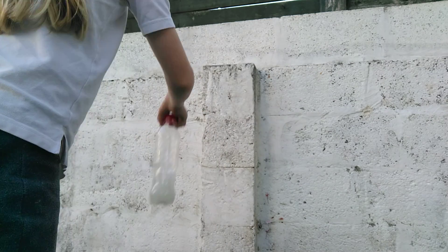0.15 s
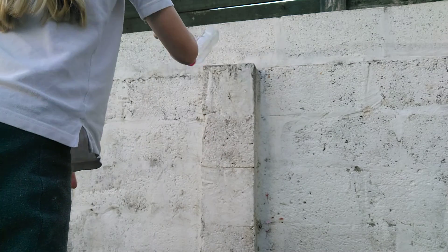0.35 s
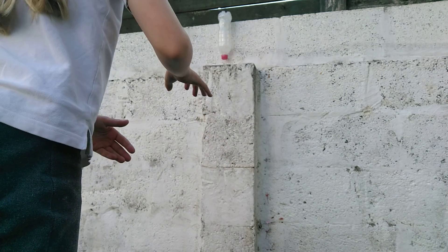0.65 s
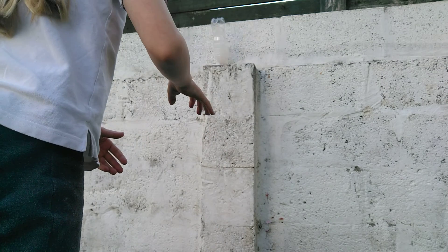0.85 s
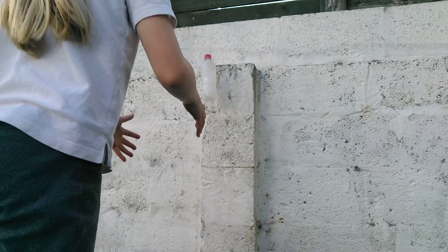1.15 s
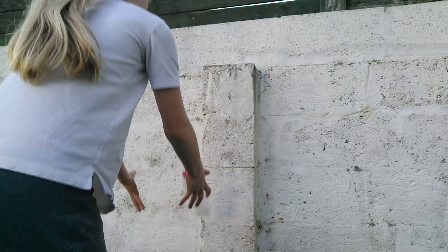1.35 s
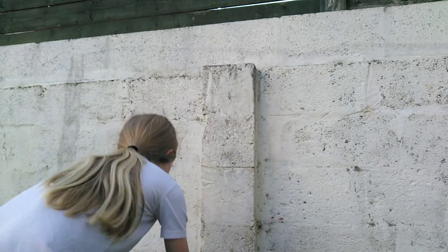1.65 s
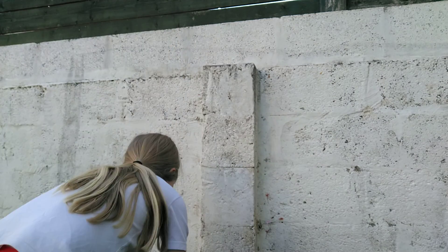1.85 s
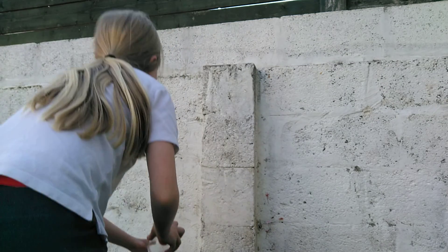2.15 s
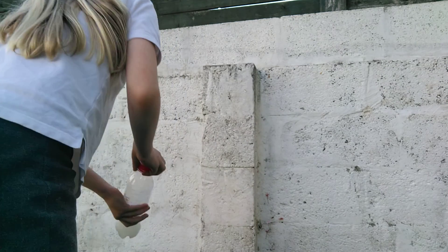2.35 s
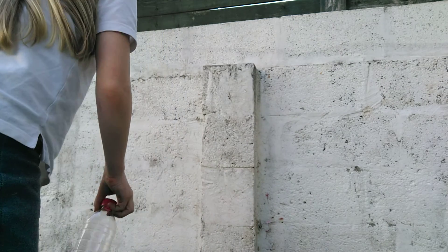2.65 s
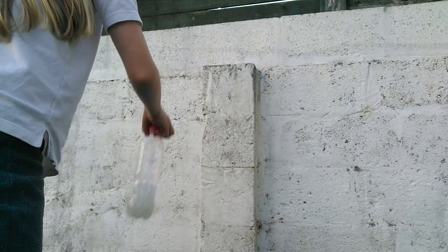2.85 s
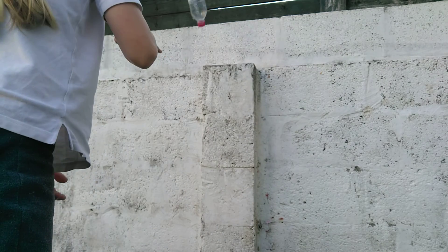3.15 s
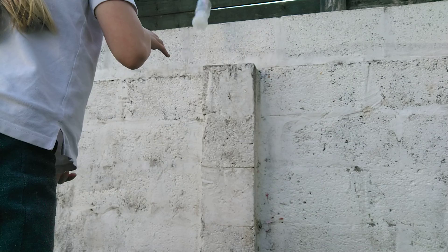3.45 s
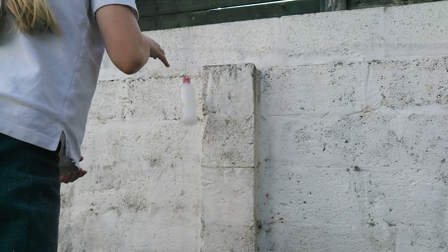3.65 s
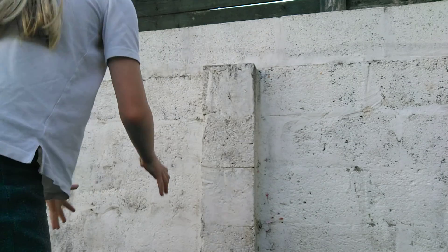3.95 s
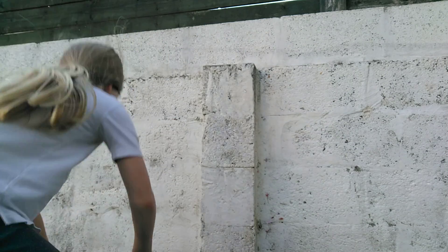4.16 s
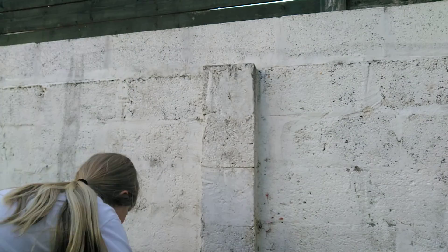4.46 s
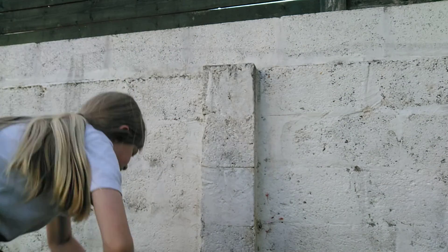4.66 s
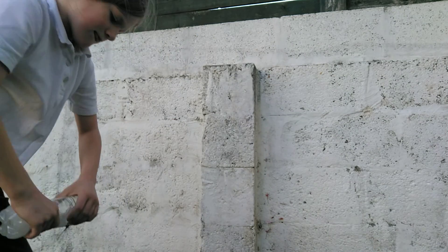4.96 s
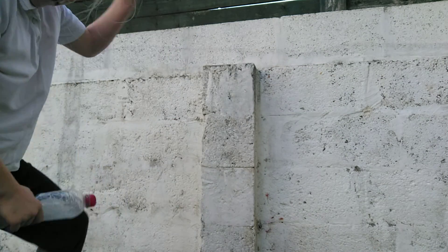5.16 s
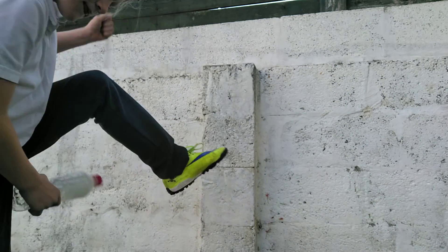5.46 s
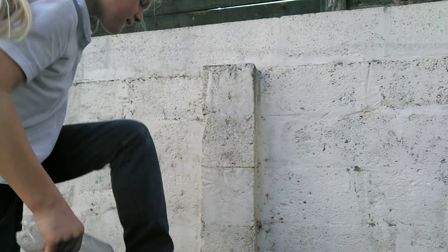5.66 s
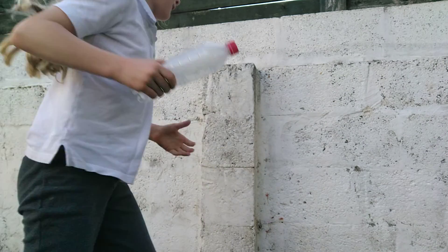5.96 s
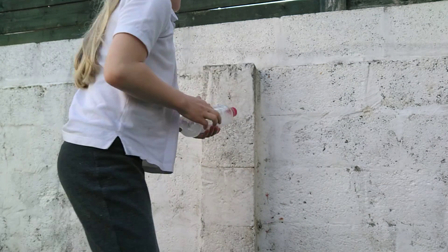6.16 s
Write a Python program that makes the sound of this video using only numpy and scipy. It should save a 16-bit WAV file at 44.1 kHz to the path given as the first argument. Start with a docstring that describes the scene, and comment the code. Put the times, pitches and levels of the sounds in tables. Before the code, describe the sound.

Outdoors, a thin plastic bottle with some water clacks on masonry, thuds down, is picked up amid rustling clothes, and finally slapped loudly.

```python
"""First cloth rustles and water swills over a faint outdoor rumble; then a part-filled plastic bottle is flipped
twice in a walled yard. It knocks against a pillar and wall, drops and is picked up, then is smacked and caught.
Each knock is a noisy crumple of the thin wall plus one ringing panel; booms and glugs are dying, rising sines.
Cloth and shoes are grainy shaped noise, the walls answer with dense echoes, and two spaced microphones listen."""
import sys
import numpy as np
from scipy import signal
from scipy.fft import rfft, irfft
from scipy.io import wavfile

SR = 44100
rng = np.random.default_rng(int(sys.argv[2]) if len(sys.argv) > 2 else 0)


def dump_mix(stems):
    """Bounce the given channels to the path in sys.argv[1] as a 16-bit WAV at rate SR."""
    frames = np.atleast_2d(stems).T  # one column per channel
    limited = np.clip(frames, -1, 1)  # hard clip at full scale
    pcm = np.round(limited * 32767).astype(np.int16)
    wavfile.write(sys.argv[1], SR, pcm)


N = 278271
AGE = np.arange(SR // 5) / SR   # seconds since a contact

# bottle knocks: [t/s, decay setting/s, relative level/dB, brightness/dB per octave,
# narrowness/dB per octave squared, relative thud level/dB, panel f/Hz, relative panel level/dB]
KNOCKS = [(0.5543, 0.0048, -25.5, -2, 1.17, -66, 1590, -25.5),
          (0.646, 0.0012, -40.5, -6, 2.5, -45, 1410, -58), (0.652, 0.0051, -36, 0, 2.5, -36.5, 412, -43.5),
          (0.764, 0.0032, -33, -3.5, 0.04, -66, 986, -33), (1.047, 0.0046, -53.5, 0, 2.1, -62, 930, -59),
          (1.5168, 0.0034, -42, -4.6, -2.06, -36, 500, -50),
          (1.524, 0.0052, -33.5, -0.4, -0.1, -38, 754, -37), (1.536, 0.0077, -41.5, 1.6, 0, -38, 1260, -43),
          (3.585, 0.0071, -39.5, 2, 2, -56, 520, -41), (3.6074, 0.013, -34.5, -2.5, 1.2, -41, 364, -34),
          (3.6201, 0.0022, -26.5, 2.5, 2.1, -49, 1760, -30),
          (3.921, 0.0017, -37, -4.4, -0.5, -41, 364, -30),
          (3.9231, 0.002, -33, 2.34, 1.07, -33.5, 640, -31),
          (4.9599, 0.0028, -33.5, 1.6, 2.5, -38.5, 1050, -38.5),
          (5.016, 0.0028, -41, 4.5, 1.05, -50, 4500, -43.5),
          (5.6436, 0.0015, -29.5, -0.5, -0.5, -35, 1297, -19.5),
          (5.646, 0.0034, -19, 0.67, 1.67, -30.5, 489, -20.5),
          (6.046, 0.0015, -33, 2.4, 7.5, -46.5, 1325, -40), (6.0883, 0.013, -43.5, 0, 0.8, -43, 406, -43.5)]
# where the bottle is: [t/s, left lag/samples, left minus right level/dB]
BOTTLE_PLACE = [(0.549, -0.5, -1.1), (.76, 4, 1.1), (1.5, 4.5, 1), (3.62, 3.5, 3.5), (3.92, 8.5, -3.7),
                (5.0, 10.5, 1.5), (5.65, 11.5, -3.5), (6.08, 6, -0.5)]
# edges of the bands that colour a contact, the thud first: [f/Hz]
BAND_EDGES_HZ = [90, 280, 700, 1400, 2800, 6000, 11000]
# ringing modes of the bottle wall: [f/Hz, relative level/dB, time to fall 60 dB/s]
WALL_MODES = [(432, -1.5, 0.1), (591, -4.5, .12), (798, -14.5, .06), (1039, -7.5, 0.088), (1140, -16, 0.21),
              (1345, 1, 0.035), (1610, -3, 0.044), (2107, 6.5, 0.051), (2490, -5.5, .06),
              (2730, -3.5, 0.069), (3350, 0, 0.049), (4100, -10.5, 0.054), (4140, -8, 0.026),
              (6530, 3.5, .06), (7130, 7.5, 0.1), (8120, 6.5, 0.08)]
# dull bumps of feet, and of the bottle rolling on the ground: [t/s, decay setting/s, level/dB, thud level/dB]
BUMPS = [(1.759, 0.011, -57, -43.5), (4.255, 0.021, -57.5, -63), (4.3188, 0.011, -54.5, -49),
         (4.358, 0.016, -59, -48.5), (4.4645, 0.0048, -58, -54), (4.585, 0.0061, -64, -53),
         (5.229, 0.0045, -57, -63), (5.525, .002, -57, -66), (5.877, .005, -60.5, -48)]
# low booms of the struck bottle and glugs of its water:
# [t/s, starting f/Hz, relative level/dB, time to fall 60 dB/s]
BOOMS_AND_GLUGS = [(.658, 407, -37.5, 0.097), (.806, 627, -34.5, 0.014), (.818, 504, -35.5, 0.024),
                   (1.522, 130, -21.5, 0.048), (1.564, 221, -31.5, 0.07), (1.577, 790, -38, 0.04),
                   (1.609, 145, -43, 0.108), (1.915, 880, -45, 0.032), (3.589, 126, -37.5, 0.12),
                   (3.976, 330, -31.5, 0.036), (4.007, 347, -32.5, 0.018), (4.519, 273, -44.5, 0.12),
                   (5.647, 178, -20, 0.043), (5.647, 398, -24, 0.087), (5.697, 524, -35, 0.046)]
# water swilling in the moving bottle: [start t/s, end t/s, lowest pocket level/dB, middle f/Hz]
SWILLS = [(0.053, 0.097, -48, 1240), (0.778, 0.874, -45, 865), (1.56, 1.63, -48, 450),
          (3.591, 3.691, -44, 440), (3.957, 4.036, -49.5, 400), (4.237, 4.433, -49.5, 680),
          (4.508, 4.596, -52, 330), (5.316, 5.544, -52, 920), (5.661, 5.72, -42, 475)]
# short snaps, ticks and rattles, some just after a knock: [t/s, relative level/dB, f/Hz]
SNAPS = [(0.3011, -55.5, 2700), (0.6062, -31, 1560), (0.616, -35, 1540), (0.8634, -47.5, 902),
         (1.166, -57, 1780), (1.213, -61, 2750), (1.708, -48.5, 7860), (1.9007, -49.5, 1200),
         (1.916, -58, 1980), (2.1386, -50, 7400), (3.002, -59, 5930), (3.331, -56.5, 2630),
         (3.419, -61.5, 1855), (4.5513, -46, 6130), (5.0696, -39.5, 4360), (5.3142, -44, 3220),
         (6.066, -39.5, 2150), (6.1007, -36.5, 1110), (6.2194, -51, 1610)]
# how hard cloth and soles rub as the player moves: [t/s, relative level/dB]
RUSTLE = [(0.0, -71.5), (0.6, -84), (0.72, -79), (0.91, -77.5), (1.42, -77), (1.72, -74), (2.05, -72),
          (2.27, -65.5), (2.74, -79), (3.53, -80.5), (3.99, -76.5), (4.09, -66.5), (4.44, -61), (4.64, -66),
          (5.17, -60.5), (5.76, -61.5), (6.08, -68.5), (6.31, -66)]
# quick swishes of sleeve and trouser leg: [t/s, half length/s, relative level/dB]
SWISHES = [(0.069, 0.017, -58.5), (0.274, 0.019, -68.5), (1.801, 0.03, -56), (2.394, 0.028, -58),
           (2.686, 0.024, -64.5), (3.019, 0.016, -69.5), (4.346, 0.012, -52.5), (5.121, 0.059, -49.5),
           (5.381, 0.013, -48.5), (5.442, .02, -50), (5.567, 0.0058, -52)]
# spectrum of the cloth hiss: [f/Hz, relative level per Hz/dB]
CLOTH_SPECTRUM = [(1180, -32), (2000, -2.5), (2220, 0.5), (2530, -6), (3340, -1.5), (5490, -2), (8550, -3),
                  (13200, -9.5), (16000, -23.5)]
# spectrum of the scraping: [f/Hz, relative level per Hz/dB]
SCRAPE_SPECTRUM = [(120, -32.5), (200, -5.5), (495, -4), (882, -4.5), (1200, -2.5), (1720, -10.5),
                   (2210, -12.5), (3000, -10.5), (3900, -43.5), (6600, -120)]
# tone colour of the yard echoes: [f/Hz, relative level/dB]
YARD_COLOUR = [(60, -6.5), (200, -2.5), (500, -1.5), (1200, -2), (2800, 0.5), (7000, -0.5), (15000, -1)]
# rise and fall of the outdoor rumble: [t/s, relative level/dB]
RUMBLE_LEVEL = [(0.0, -72), (0.67, -63.5), (1.23, -75), (1.76, -70), (2.95, -74), (3.87, -66), (5.59, -65),
                (6.31, -67.5)]
# spectrum of the outdoor rumble: [f/Hz, relative level per Hz/dB]
RUMBLE_SPECTRUM = [(15, -46), (25, -26.5), (65, -3.5), (97, -1), (112, 2), (189, -15), (228, -15),
                   (310, -19.5), (350, -12.5), (460, -34), (770, -120)]
# a faint, far whistle: [t/s, level/dB]
WHISTLE = [(3.05, -100), (3.2, -83.5), (3.3, -89), (3.4, -77.5), (3.6, -100)]
# tone colour shared by both microphones: [f/Hz, level/dB]
MIC_COLOUR = [(1000, 0.5), (3000, 2), (4500, 2), (6300, 2), (8100, -0.5), (10000, -2.5), (15000, -2.5)]
# difference between the microphones: [f/Hz, left minus right level/dB]
MIC_BALANCE = [(60, -2.6), (700, -0.5), (2400, -3), (4400, -0.5), (6000, 3), (8100, -10), (11000, -6),
               (15000, -6.5)]

MIC_SPACING_M = 0.2
CUTOFF_HZ = 16100
KNOCK_CENTRE_HZ = 1470   # a knock's colour tilts and narrows about this pitch
PILLAR_UNTIL_S = 1.2   # the first knocks are on the hard top of the pillar
BUMP_BRIGHTNESS, BUMP_NARROWNESS = -3, 0.17   # dB per octave, dB per octave squared
RUSTLE_MIDDLE_DB = -68   # an ordinary movement


def knocks(note_db=0.0, wall_db=-15.0, panel_t60=0.035, level_db=-4.0, crack_db=-17.0, crack_hz=10500.0):
    """A crumple rings the wall; a panel loaded by water gives the note, and the pillar adds a crack."""
    out = np.zeros((2, N))
    modes = sum(from_db(db) * ring(hz, t60) for hz, db, t60 in WALL_MODES)
    for s, decay, db, brightness, narrowness, thud_db, panel_hz, panel_db in KNOCKS:
        force = unit_energy(crumple(decay))
        wall = unit_energy(signal.fftconvolve(force, modes)[:len(AGE)])
        contact = force + from_db(wall_db) * wall
        body = from_db(level_db) * coloured(contact, db, brightness, narrowness, thud_db)
        panel = unit_energy(band(ring(panel_hz, panel_t60), panel_hz / 2, 2 * panel_hz, order=1))
        knock = body - from_db(panel_db + note_db) * panel
        if s < PILLAR_UNTIL_S:
            crack = unit_energy(band(force, crack_hz, CUTOFF_HZ, order=2))
            knock = knock + from_db(db + crack_db) * crack
        add(out, s, knock, *place(s))
    return out


def place(s):
    """Left lag and balance follow the bottle from place to place."""
    times, *columns = np.transpose(BOTTLE_PLACE)
    return [np.interp(s, times, column) for column in columns]


def crumple(decay, rise=0.00053, grain_db=2.0):
    """A contact is a quickly dying burst of tiny slips and buckles, spread evenly over all pitches."""
    white, size = rng.standard_normal((2, len(AGE)))
    shape = (1 - np.exp(-AGE / rise)) * np.exp(-AGE / (2 * max(decay, .0005)))
    spectrum = rfft(white * from_db(grain_db * size) * shape)
    even = irfft(spectrum / (np.abs(spectrum) + 1e-12), len(AGE))   # same strength at every pitch
    return even * np.sqrt(shape)


def coloured(force, db, brightness, narrowness, thud_db):
    """Weight gives a low thud; above it hard contacts are bright and glancing ones keep to the middle."""
    edges = np.array(BAND_EDGES_HZ)
    middles_hz = np.sqrt(edges[1:-1] * edges[2:])
    octaves = np.log2(middles_hz / KNOCK_CENTRE_HZ)
    upper_db = db + brightness * octaves - narrowness * octaves ** 2
    gains = from_db([thud_db, *upper_db])
    parts = []
    for gain, low, high in zip(gains, edges, edges[1:]):
        parts.append(gain * unit_energy(band(force, low, high, order=2)))
    return sum(parts[::2]) - sum(parts[1::2])   # opposite signs let neighbouring bands join without a notch


def bumps():
    """Feet, and the bottle rolling on the ground, make soft contacts with no ring."""
    out = np.zeros((2, N))
    for s, decay, db, thud_db in BUMPS:
        bump = coloured(crumple(decay), db, BUMP_BRIGHTNESS, BUMP_NARROWNESS, thud_db)
        add(out, s, bump, *place(s))
    return out


def booms_and_glugs(rise=0.087, swell=0.00083, splash_db=-14.0, splash_decay=0.0089, lag=6):
    """Each boom or glug is a dying tone that climbs in pitch, with a dull noisy splash."""
    out = np.zeros((2, N))
    for s, hz, db, t60 in BOOMS_AND_GLUGS:
        swelling = 1 - np.exp(-AGE / swell)
        tone = band(ring(hz, t60, rise) * swelling, hz / 2, 2 * hz, order=1)
        splash = unit_energy(band(crumple(splash_decay), 0.66 * hz, 2.46 * hz, order=2))
        add(out, s, from_db(db) * (tone + from_db(splash_db) * splash), lag)
    return out


def swill(per_s=260.0, range_octaves=1.38, cycles=3.9, spread_db=7.0, lag=8):
    """Swilling traps many small pockets of air, each ringing for a few cycles."""
    out = np.zeros((2, N))
    for start, end, db, middle_hz in SWILLS:
        pockets = rng.random((round((end - start) * per_s), 3))
        for when, size, strength in pockets:
            hz = middle_hz * 2 ** (range_octaves * (size - .5))
            pocket = band(ring(hz, cycles / hz), hz / 2, 2 * hz, order=1)
            s = start + when * (end - start)
            add(out, s, from_db(db + spread_db * strength) * pocket, lag)
    return out


def snaps(level_db=-5.0, decay=.004, lag=5):
    """Snaps, ticks and rattles are short crumples kept near one pitch."""
    out = np.zeros((2, N))
    for s, db, hz in list(SNAPS) + faint_snaps():
        near_pitch = band(crumple(decay), .5 * hz, 2 * hz, order=1)
        snap = band(near_pitch, 500, 11000, order=2)
        add(out, s, from_db(db + level_db) * unit_energy(snap), lag)
    return out


def faint_snaps(above_db=5.5, spread_db=3.5, low_hz=1000.0, high_hz=7000.0, count=70):
    """Tiny snaps come at random, their level following the movement; rows are like SNAPS."""
    when, strength, size = rng.random((count, 3)).T
    s = when * (N - 1) / SR
    movement_db = np.interp(s, *np.transpose(RUSTLE))
    db = movement_db + above_db + spread_db * (2 * strength - 1)
    hz = low_hz * (high_hz / low_hz) ** size
    return list(zip(s, db, hz))


def rustle(hiss_db=2.0, hiss_follows=1.06, scrape_db=1.5, scrape_follows=.75, swish_scrape_db=-6.0,
           catch_db=2.16, fibre_db=2.0):
    """Rubbing catches and slips, grainy with fibres and grit; hiss grows faster with effort than scrape."""
    effort_db = in_time(RUSTLE)[0] - RUSTLE_MIDDLE_DB
    t = np.arange(N) / SR
    swish = np.zeros(N)
    for s, half, db in SWISHES:
        swish += from_db(db) * np.exp(-np.minimum(((t - s) / half) ** 2 / 2, 20))
    steady_hiss = from_db(RUSTLE_MIDDLE_DB + hiss_db + hiss_follows * effort_db)
    steady_scrape = from_db(RUSTLE_MIDDLE_DB + scrape_db + scrape_follows * effort_db)
    hiss = np.hypot(steady_hiss, swish)
    scrape = np.hypot(steady_scrape, from_db(swish_scrape_db) * swish)
    grip = from_db(catch_db * drift(60) + fibre_db * drift(600))
    return grip * (hiss * diffuse(CLOTH_SPECTRUM) + scrape * diffuse(SCRAPE_SPECTRUM))


def yard(dry, early_db=-9.5, hold=0.066, late_db=-2.5, t60=0.4, early_t60=0.36, scatter_db=5.0):
    """The near walls return a dense cluster of echoes; after it the sound escapes to the sky."""
    t = np.arange(SR * 3 // 4) / SR
    shape_db = -60 * np.minimum(t, hold) / early_t60 - 60 * np.maximum(t - hold, 0) / t60
    shape_db += late_db * np.clip((t - hold) / 0.024, 0, 1)
    shape_db += scatter_db * drift(1500)[:len(t)]
    onset = np.clip((t - .003) / 0.0024, 0, 1)
    echoes = diffuse(YARD_COLOUR, size=len(t)) * from_db(shape_db) * onset
    echoes = echoes / np.sqrt(np.sum(echoes ** 2) / 2)
    return from_db(early_db) * signal.fftconvolve(dry[1:], echoes, axes=1)[:, :N]   # fed by the right channel


def hollow(x, dip_hz=300.0, q=4.6, depth=0.83):
    """The bounce off the nearest surface cancels part of the low middle."""
    notched = signal.lfilter(*signal.iirnotch(dip_hz, q, fs=SR), x)
    return x + depth * (notched - x)


def outdoor_rumble(level_db=3.0):
    """Low noise from all sides slowly swells and fades."""
    return from_db(in_time(RUMBLE_LEVEL)[0] + level_db) * diffuse(RUMBLE_SPECTRUM)


def whistle(hz=4935.0, width_hz=150.0):
    """A narrow band of noise sounds like a thin, wavering tone from beyond the wall."""
    tone = band(rng.standard_normal((2, N)), hz - width_hz / 2, hz + width_hz / 2, order=2)
    return from_db(in_time(WHISTLE)[0]) * tone / tone.std()


def air(db=-84.0):
    """Plain random noise makes a faint, even hiss under everything."""
    return from_db(db) * rng.standard_normal((2, N))


def diffuse(spectrum, size=N):
    """Noise from all sides, rms 1: the microphones agree only on waves longer than their spacing."""
    hz = np.fft.rfftfreq(size, 1 / SR)
    alike = .97 * np.sinc(2 * hz * MIC_SPACING_M / 343)   # speed of sound 343 m/s
    mid, side = rfft(rng.standard_normal((2, size))) * from_db(at_hz(spectrum, hz))
    pair = irfft(np.sqrt(1 + alike) * mid + np.sqrt(1 - alike) * side * [[1], [-1]], size)
    return pair / pair.std()


def ring(hz, t60, rise=0):
    """A dying sine whose pitch may climb by the share rise per t60."""
    bent_time = AGE + rise * AGE ** 2 / (2 * t60)
    return np.sin(2 * np.pi * hz * bent_time) * from_db(-60 * AGE / t60)


def band(x, low_hz, high_hz, order=3):
    """Keep the pitches between two limits, using only past sound."""
    limits = [low_hz, min(high_hz, .45 * SR)]
    return signal.sosfilt(signal.butter(order, limits, "band", fs=SR, output="sos"), x)


def drift(per_s):
    """Random values of spread 1, per_s of them a second, joined by straight lines."""
    return np.interp(np.arange(N) / SR * per_s, np.arange(4000), rng.standard_normal(4000))


def add(out, s, sound, lag=0, pan_db=0):
    """Put a sound into both channels; the left one hears it lag samples later."""
    steps = np.arange(len(sound))
    left = np.interp(steps - np.floor(lag + .5), steps, sound, left=0)
    pair = np.array([left, sound]) * from_db([[pan_db / 2], [-pan_db / 2]])
    start = round(s * SR)
    out[:, start:start + len(sound)] += pair[:, :N - start]


def from_db(db):
    """Turn decibels into gain."""
    return 10 ** (np.asarray(db) / 20)


def unit_energy(x):
    """Scale to the energy of 10 ms at rms 1."""
    return x * np.sqrt(SR / 100 / (np.sum(x ** 2) + 1e-20))


def in_time(rows):
    """Read each column of a curve at every sample."""
    s, *columns = np.transpose(rows)
    return [np.interp(np.arange(N) / SR, s, column) for column in columns]


def at_hz(points, hz):
    """Read a spectrum on a log-frequency axis."""
    points = np.array(points)
    return np.interp(np.log(np.maximum(hz, 1)), np.log(points[:, 0]), points[:, 1])


def scene(ground_db=-7.5, wall_note_db=-6.0):
    """Bottle, water and player sound together in the yard."""
    small = bumps() + booms_and_glugs() + swill() + snaps()
    # less of the knocks echoes from the ground at the foot of the pillar
    lying = np.interp(np.arange(N) / SR, [1.3, 1.4, 2.0, 2.1], [0, 1, 1, 0])
    echoes = np.zeros((2, N))
    for wall in range(2):   # the bottle sends a different crackle towards each wall
        towards_wall = knocks(note_db=wall_note_db) * from_db(ground_db * lying)
        echoes += yard(small + towards_wall) / np.sqrt(2)
    bottle = hollow(knocks() + echoes)
    return bottle + small + rustle() + outdoor_rumble() + whistle() + air()


def record(dry, low_cut_hz=20.0):
    """The right microphone is louder at most pitches; deep bass and the extreme top are cut."""
    hz = np.linspace(0, SR / 2, 257)
    colour_db = at_hz(MIC_COLOUR, hz)
    tilt_db = at_hz(MIC_BALANCE, hz) / 2
    pair = []
    for channel, sign in zip(dry, (1, -1)):
        microphone = signal.firwin2(129, hz, from_db(colour_db + sign * tilt_db), fs=SR)
        pair.append(signal.fftconvolve(channel, microphone, "same"))
    pair = signal.sosfilt(signal.butter(2, low_cut_hz, "high", fs=SR, output="sos"), pair)
    pair = np.tanh(pair)   # the loudest peaks are rounded
    return signal.sosfilt(signal.ellip(10, .1, 80, CUTOFF_HZ, fs=SR, output="sos"), pair)


dry = scene()
out = record(dry)
dump_mix(out)
```